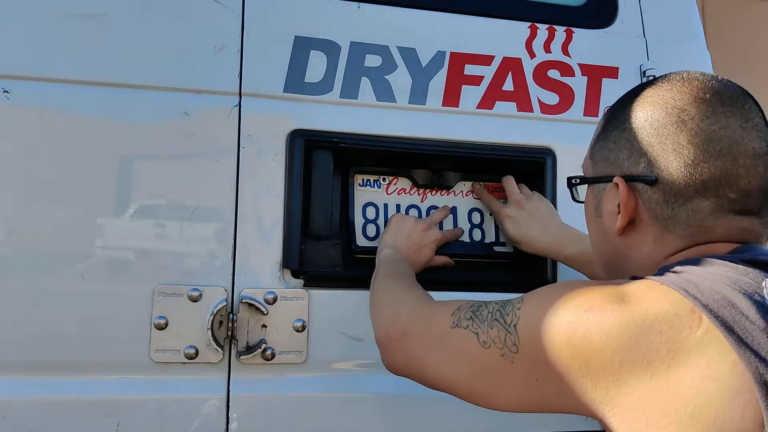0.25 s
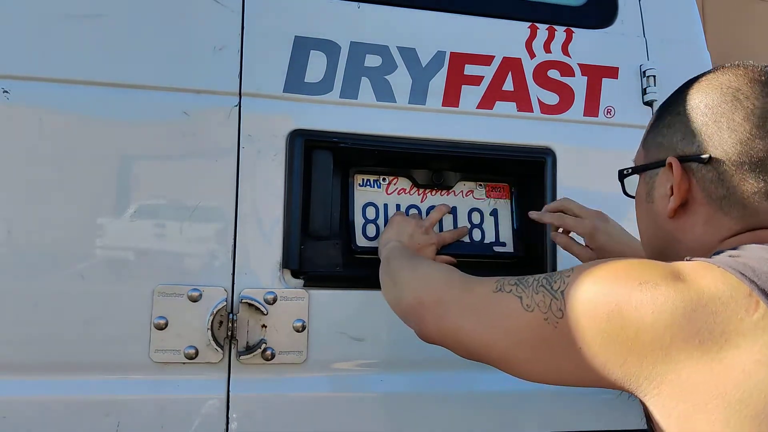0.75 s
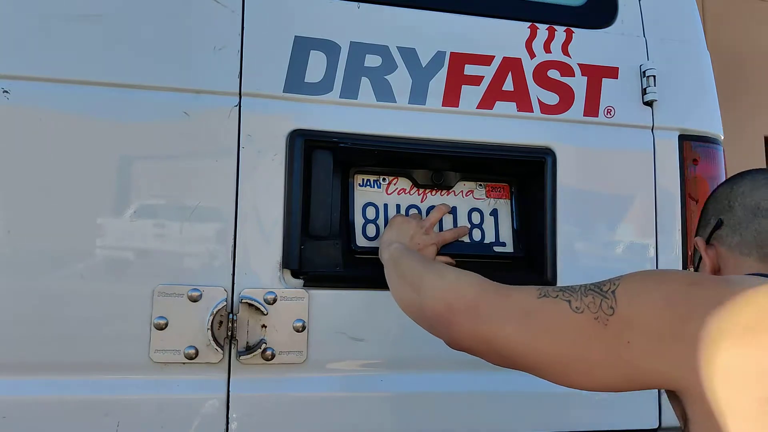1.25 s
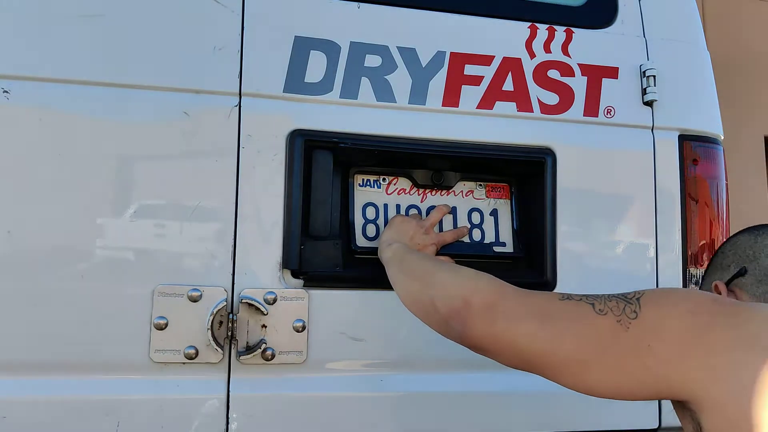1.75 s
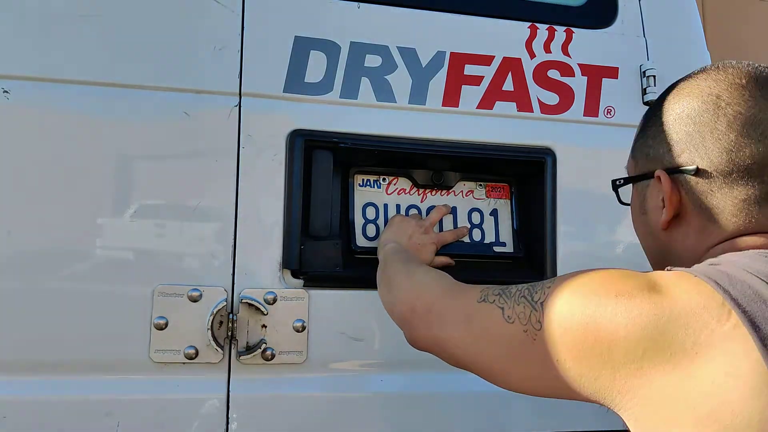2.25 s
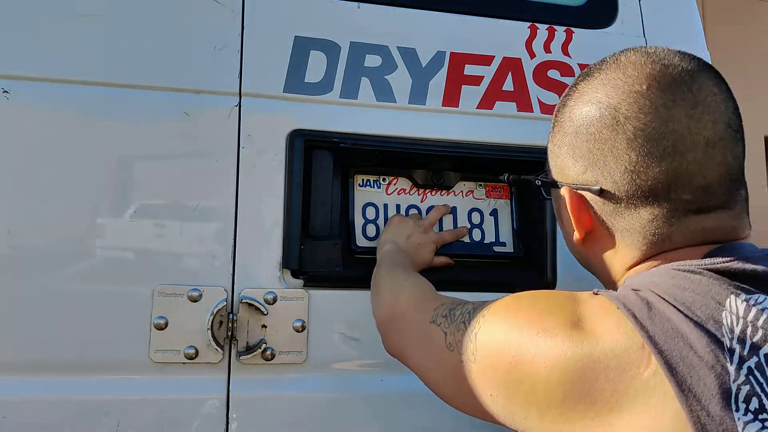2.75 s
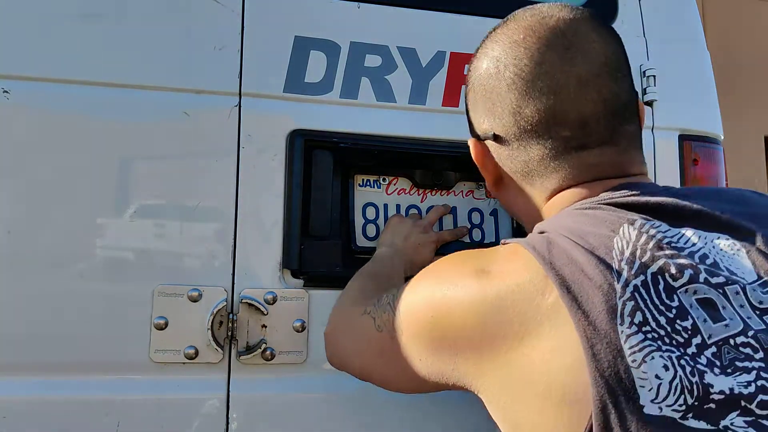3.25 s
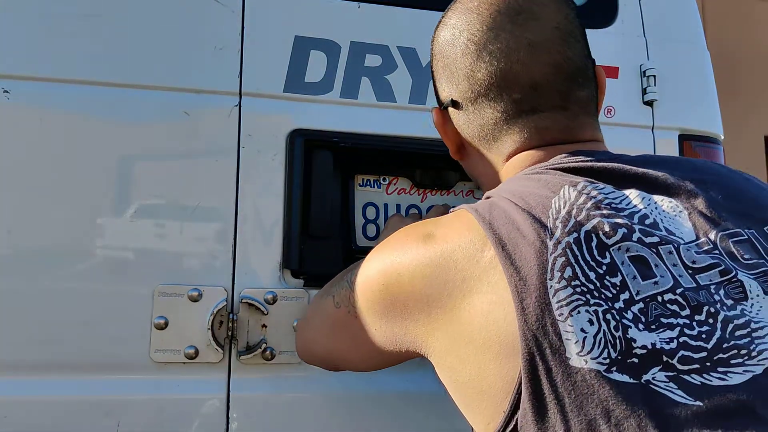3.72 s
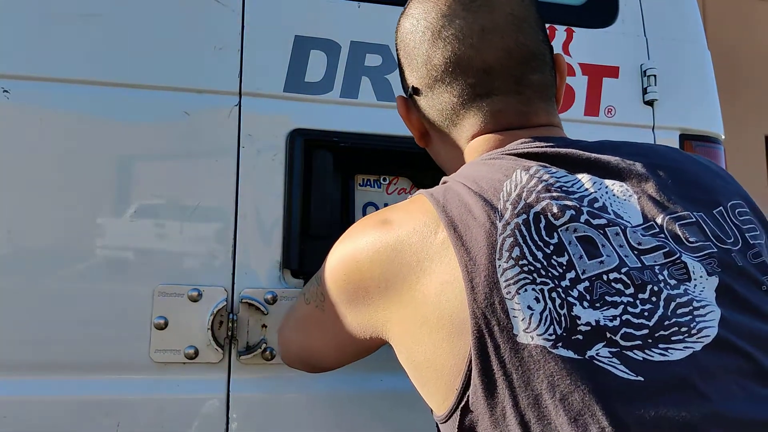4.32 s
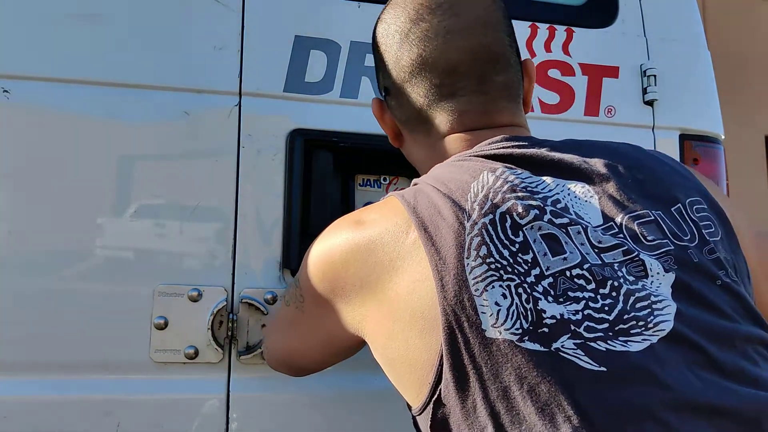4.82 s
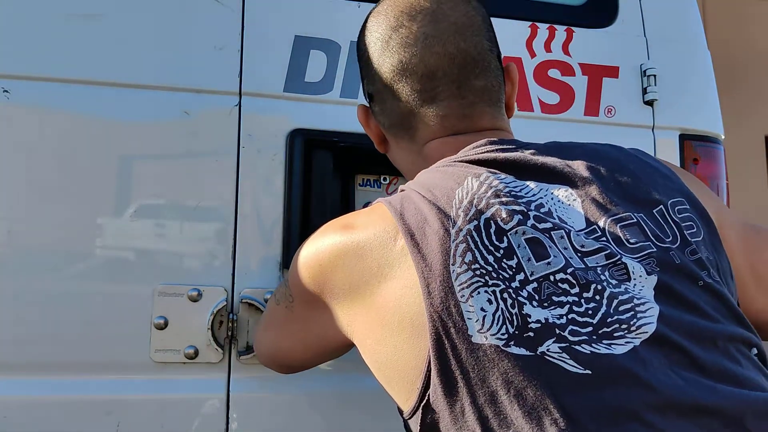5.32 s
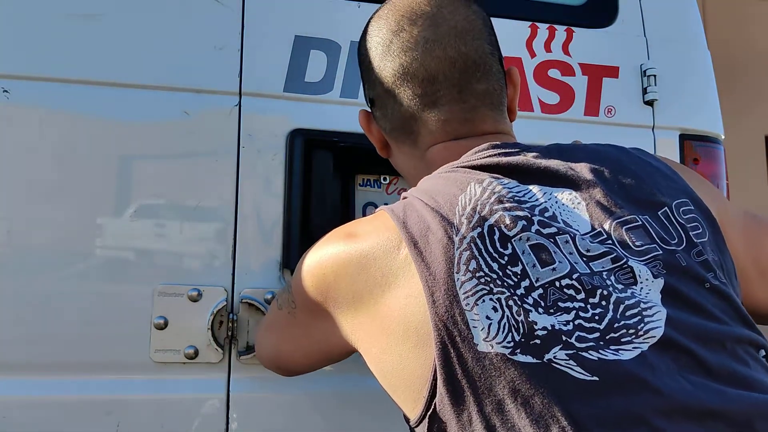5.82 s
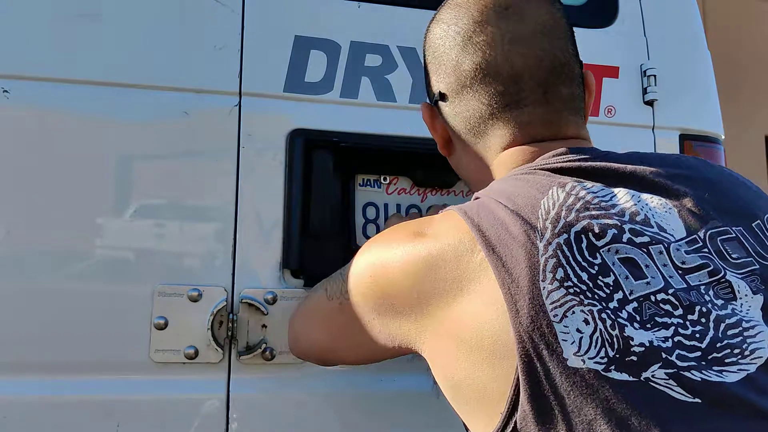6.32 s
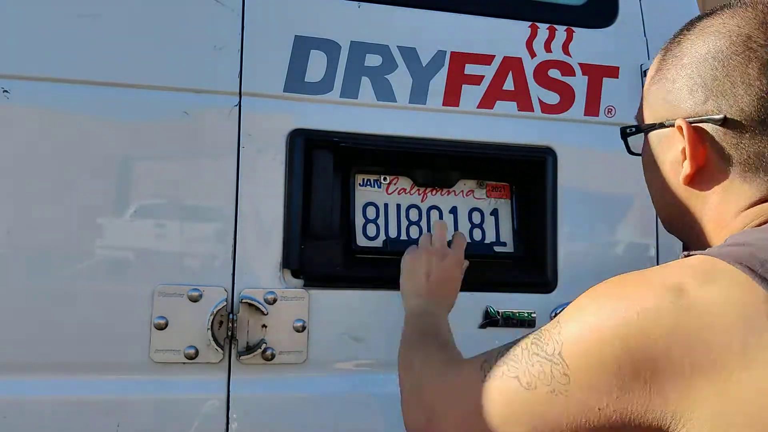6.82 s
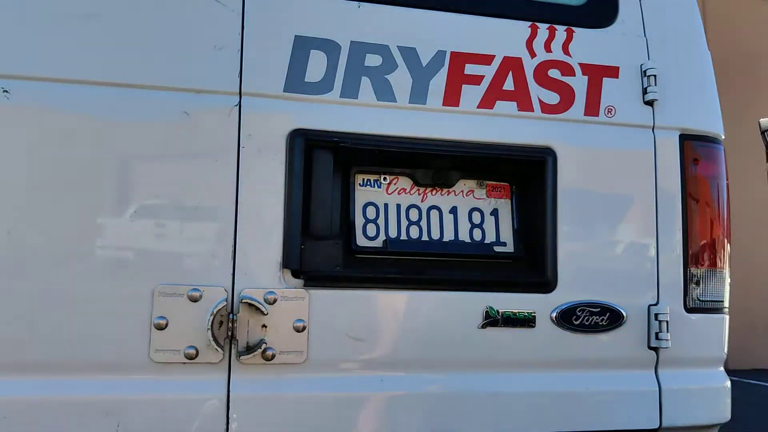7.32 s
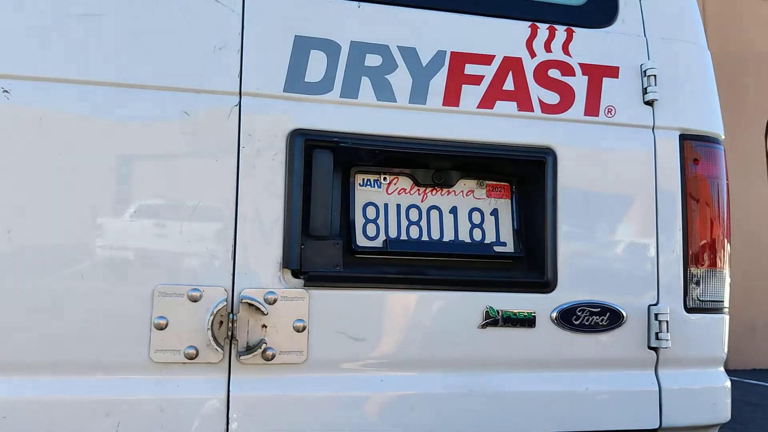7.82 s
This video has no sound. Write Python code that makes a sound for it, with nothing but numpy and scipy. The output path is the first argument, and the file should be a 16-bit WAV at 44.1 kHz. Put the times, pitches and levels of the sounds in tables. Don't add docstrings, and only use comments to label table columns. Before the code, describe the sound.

A low, steady rumble of distant traffic and machinery with faint hiss runs throughout an open yard. From 0.1 to 0.85 s, close light plastic and metallic clicks come in an irregular cluster, growing to a crisp tap at 0.85. It is nearly empty until a bright double click at 1.96. Very soft presses follow at 3.3 and 4.0 to 4.2, then a firmer knock with a low panel boom at 4.7. From 4.9 a screw grates in a low, slowing stick-slip judder, pulsing with each wrist turn, jumping to a higher squeak at 5.7 to 5.9. At 5.94 to 6.08 it slips: three loud, sharp cracks in rapid succession, with dull catches, boom and rattling buzz. A low metal ring and wash decay over about a second, with cloth rustle and a hard knock at 6.3. Faint touches until 7.2, then rumble; two tiny ticks at 8.0.

```python
import sys
import numpy as np
from scipy import signal
from scipy.fft import rfft, irfft
from scipy.io import wavfile

SR = 44100
rng = np.random.default_rng(int(sys.argv[2]) if len(sys.argv) > 2 else 0)


def elevation(decibels):
    levels = np.asarray(decibels, float)
    return 10 ** (levels / 20)


def unload_wav(signal):
    wavfile.write(
        sys.argv[1],
        SR,
        np.round(np.clip(np.atleast_2d(signal).T, -1, 1) * 32767).astype(np.int16),
    )


N = 355446

# start_s [s], frame_peak_db [dB], door_db [dB above frame], screw_db [dB above frame]
BIT_SLIPS = [
    (5.9389, -13, 1.5, -9),
    (5.9583, -4.5, -6.5, 1),
    (5.9787, -22.5, 2.5, -5),
    (6.0081, -3.5, -9.5, -3),
    (6.0341, -15.5, 2, -3),
    (6.0555, -4, -7, 0),
    (6.0848, -12.5, -6.5, -10.5),
]
# pitch_hz [Hz], level_db [dB per Hz]
FAR_HISS = [(88, -38.5), (150, -4), (179, -2.5), (209, -7.5), (459, -15.5), (496, -15), (628, -13),
            (1030, -19.5), (1110, -21), (3020, -37), (9220, -45), (15100, -42), (16300, -54)]
# pitch_hz [Hz], likeness [-1 to 1]
FAR_WIDTH = [(60, 0.99), (150, 0.96), (380, 0.61), (950, -0.35), (2380, -0.04), (5980, 0.055),
             (15000, -0.17)]
NEAR_WIDTH = [(60, 0.986), (180, 1), (550, 0.94), (1650, 0.7), (4970, 0.2), (15000, -0.69)]
LET_GO_S = 0.038


def rms_one(x):
    return x / np.sqrt(np.mean(x ** 2) + 1e-20)


def in_time(rows, t):
    s, *columns = np.transpose(rows)
    return [np.interp(t, s, c) for c in columns]


def at_hz(points, hz):
    point_hz, value = np.transpose(points)
    return np.interp(np.log(hz + 1), np.log(point_hz), value)


def coloured(x, spectrum):
    size = x.shape[-1]
    hz = np.arange(size // 2 + 1) * SR / size
    return rms_one(irfft(rfft(x) * elevation(at_hz(spectrum, hz)), size))


def stereo_noise(size, likeness):
    mid, side = rfft(rng.standard_normal((2, size)))
    alike = np.clip(at_hz(likeness, np.arange(len(mid)) * SR / size), -1, 1)
    return irfft(np.sqrt(1 + alike) * mid + np.sqrt(1 - alike) * side * [[1], [-1]], size)


def drift(rate_hz, size):
    r = np.exp(-2 * np.pi * rate_hz / SR)
    wander = signal.lfilter([1], [1, -2 * r, r * r], rng.standard_normal(size + SR // 2))
    return rms_one(wander[SR // 2:])


def add(out, at_s, sound):
    i = round(at_s * SR)
    out[:, i:i + sound.shape[1]] += sound[:, :N - i]


def yard():
    # time_s [s], rumble_db [dB]
    traffic = [(0.0, -36.5), (0.4, -37.5), (4.24, -41.5), (4.67, -40), (5.72, -41.5), (6.06, -38),
               (7.12, -42), (8.06, -42)]
    # pitch_hz [Hz], level_db [dB per Hz]
    rumble_shape = [(8.8, -36.5), (15, -7), (32, 0.5), (59, 3), (75, 1), (92, -7.5), (125, -2), (136, -13),
                    (145, -24.5), (178, -19), (210, -25.5), (230, -25), (250, -26), (320, -53.5),
                    (550, -120)]
    rumble_db, = in_time(traffic, np.arange(N) / SR)
    hiss_db = -53 + 0.73 * (rumble_db - rumble_db.mean())
    rumble = elevation(rumble_db + 2.2 + .5 * drift(3, N)) * coloured(stereo_noise(N, FAR_WIDTH), rumble_shape)
    hiss = elevation(hiss_db + .5 * drift(4.8, N)) * coloured(stereo_noise(N, FAR_WIDTH), FAR_HISS)
    return (rumble + hiss) * elevation([[.4], [-.4]])


def rustle():
    # start_s [s], length_s [s], peak_db [dB]
    strokes = [(0.116, 0.03766, -60.5), (0.195, 0.063, -63), (.74, .09, -69), (0.89, 0.06247, -67),
               (1.984, .12, -62), (4.665, 0.04, -68), (6.094, 0.14, -54), (6.332, 0.05713, -84),
               (6.559, 0.16853, -61.5), (6.695, 0.26, -71.5), (7.098, 0.19, -65.5)]
    shape = [(1200, -26.5), (2500, -5.0), (4000, -9.0), (5800, -1), (7500, -15.0), (15000, -23.0)]   # (Hz, dB per Hz)
    t = np.arange(N) / SR
    level = np.zeros(N)
    for start_s, length_s, peak_db in strokes:
        level += elevation(peak_db) * np.sin(np.pi * np.clip((t - start_s) / length_s, 0, 1) ** 1.1)
    return level * elevation(0.83 * drift(40, N)) * coloured(stereo_noise(N, NEAR_WIDTH), shape)


def struck(modes, size, contact_s, at_once, unlike, tilt_db, damping):
    hz, level_db, t60_s = np.repeat(np.transpose(modes), 9, axis=1)
    level_chance, side_chance, pitch_chance, phase_chance = rng.standard_normal((4, len(hz)))
    starts_s = contact_s * np.maximum(rng.exponential(1, len(hz)) - at_once, 0)
    since_s = np.maximum(np.arange(size) / SR - starts_s[:, None], 0)
    rise = np.minimum(3 * hz[:, None] * since_s, 1)
    pole = 2j * np.pi * hz * (1 + .07 * pitch_chance) - damping * np.log(1000) / t60_s
    rings = np.exp(pole[:, None] * since_s) * rise
    phase = phase_chance + unlike * np.minimum(hz / 2200, 1) * side_chance * [[1], [-1]]
    strength = elevation(level_db + tilt_db * np.log2(hz / hz[0]) + 2.0 * level_chance)
    out = np.imag(strength * np.exp(1j * phase) @ rings)
    fade = np.cos(np.pi / 2 * np.arange(size) / size) ** 2
    return out / np.abs(out).max() * fade


def knocks(rows, contact_s, at_once, crack_s, door_db, crack_db, pan_db, soft_db, damping, door_unlike=.1):
    # pitch_hz [Hz], level_db [dB], t60_s [s]
    frame_modes = [(1113, -4.5, 0.09), (1327, 1, 0.054), (1602, 1.5, 0.066), (1950, -6, 0.14),
                   (2280, 3, 0.059), (2600, -3.5, 0.088), (3220, -3, 0.046), (3513, 3.5, 0.014)]
    door_modes = [(210, 2.5, 0.092), (295, -2, 0.091), (370, 1.5, 0.051), (440, -12.5, 0.23),
                  (553.78, -4, 0.098), (671, 1.5, 0.065), (735, -2, .06), (897, 3, 0.054)]
    screw_modes = [(4200, -4.5, 0.088), (4190, -0.5, 0.0077), (4860, -8, 0.016), (5187, 0.5, 0.024),
                   (5530, 6, 0.012), (5533, 3.5, 0.06), (6290, -5.5, 0.036), (6670, -1.5, 0.029),
                   (7150, -20, 0.011)]
    out, size = np.zeros((2, N)), 1536
    t = np.arange(size) / SR
    top = signal.butter(2, 7000, "high", fs=SR, output="sos")
    for start_s, frame_db, low_db, screw_db in rows:
        dull_db = low_db + door_db - screw_db
        touch_s = contact_s * elevation(np.clip(.25 * dull_db, -8, 8))
        place_db = pan_db + 1.5 * rng.uniform(-1.7, 1)
        blow = elevation(place_db * np.array([[.5], [-.5]])) * elevation(frame_db)
        frame_tilt_db = np.clip(-.3 * dull_db, -8, 1.5) - soft_db
        frame = struck(frame_modes, size, touch_s, at_once, 0.67, frame_tilt_db, damping)
        door = struck(door_modes, 3 * size, 1.5 * touch_s, at_once, door_unlike, -0.75 - 1.3 * soft_db, damping)
        head = struck(screw_modes, size, touch_s, at_once, 0.69, -1.9, damping)
        bright_db = crack_db + .6 * screw_db + 0.21 * (frame_db + 25.5)
        swell = np.exp(-t / crack_s) * np.minimum(t / touch_s * 0.98, 1)
        crack = signal.sosfilt(top, rng.standard_normal((2, size))) * swell
        add(out, start_s, blow * frame)
        add(out, start_s, blow * elevation(low_db + door_db) * door)
        add(out, start_s, blow * elevation(screw_db) * head)
        add(out, start_s, blow * elevation(bright_db) * crack)
    return out


def frame_taps():
    taps = [(0.1186, -49, -4, -12), (0.1854, -61.5, -1, 10), (0.2608, -24, -27.5, -6),
            (0.3471, -27, -8.5, -10), (0.3781, -26, -20.5, 1), (0.5044, -34, -23.5, -8),
            (0.5151, -32.5, -24, -2), (0.5287, -30.5, -23.5, -4), (0.5404, -39.5, -13, -21),
            (0.5544, -36, -19, -18), (0.5651, -31.5, -16, -0.5), (0.594, -25.5, -25, -1),
            (0.6424, -25, -29, 6), (0.6683, -35, -14, -13), (0.7083, -18.5, -28, 2.5),
            (0.845, -14, -31.5, -4), (1.4331, -49, -2.5, -19.5), (1.9586, -13.5, -28, 5.5),
            (1.9722, -19.5, -21.5, 1)]
    return knocks(taps, contact_s=.0012, at_once=.7, crack_s=0.0023, door_db=7.5, crack_db=-10.5, pan_db=0.7,
                  soft_db=-1.6, damping=1.45)


def frame_presses():
    presses = [(3.321, -44, 5, -14), (3.3344, -48.5, -8, -19), (3.3795, -44, 5, -20),
               (3.9769, -38.5, -2.5, -4.5), (4.0075, -47.5, 1, -11), (4.131, -45, -4.5, -19.5),
               (4.1955, -36.5, 0.5, -5.5), (4.2093, -33, -8, -4.5), (4.7246, -17.5, -4.5, -2.5),
               (4.819, -29, -13.5, 2.5), (6.1809, -39.5, -3, -26), (6.2337, -38.5, -16, -18),
               (6.6801, -44, -7, -14), (6.7844, -54, -11, -9)]
    return knocks(presses, contact_s=.0015, at_once=.4, crack_s=0.0023, door_db=6.5, crack_db=-7.5, pan_db=2.5,
                  soft_db=-0.5, damping=0.77)


def door_shake():
    shakes = [
        (4.682, 0.17, -34, -55, 62),
        (5.951, 0.12, -26.5, -29.5, 405),
        (6.098, 0.014, -30.5, -51, 55),
        (6.292, 0.01299, -51, -52.5, 202),
    ]
    boom_shape = [(18, -18.5), (38, 18), (70, -7.5), (160, -4.5), (300, -58.5), (600, -100)]   # (Hz, dB per Hz)
    buzz_shape = [(150, -35.5), (300, -2.5), (900, -10.5), (2500, -18), (6000, -20), (8000, -33.5),
                  (16000, -32.5)]
    out, rise_s, tail_s = np.zeros((2, N)), 0.01, .25
    for start_s, hold_s, boom_db, buzz_db, release_db_per_s in shakes:
        t = np.arange(0, hold_s + tail_s, 1 / SR)
        release = elevation(-release_db_per_s * np.maximum(t - hold_s, 0))
        shape = np.minimum(t / rise_s, 1) * release * np.minimum((t[-1] - t) / .03, 1)
        noise = stereo_noise(len(t), NEAR_WIDTH)
        boom = elevation(boom_db) * coloured(noise, boom_shape)
        buzz = elevation(buzz_db + 6.0 + 2.0 * drift(30, len(t))) * coloured(noise, buzz_shape)
        add(out, start_s, (boom + buzz) * shape)
    t = np.arange(SR) / SR
    wash_s, wash_db, wash_t60_s = 6.08, -35.5, 1.3
    wash = coloured(stereo_noise(SR, FAR_WIDTH), FAR_HISS)
    add(out, wash_s, elevation(wash_db - 60 * t / wash_t60_s) * np.minimum(t / rise_s, 1) * wash)
    return out


def pressure(turns, t):
    return sum(np.interp(t, [start, peak, peak + LET_GO_S], [0, 1, 0]) for start, peak, *_ in turns)


def thread(start_s, end_s, rates, turns, tone, jitter, high_clean, broken_db, low_db, high_db, high_push_db,
           fade_db_per_s):
    # pitch_hz [Hz], level_db [dB per Hz]
    low_shape = [(120, -19), (200, 1.5), (429, -10), (660, 3), (823, -6), (1220, -2.5), (2200, -27),
                 (2860, -23), (4840, -120)]
    high_shape = [(880, -36), (1500, -15.5), (1940, -14), (2210, -5), (2490, -10.5), (2830, -6.5),
                  (3220, -7.5), (3410, -6.5), (4290, -14), (5830, -7), (7920, -19), (14500, -21.5),
                  (16000, -30.5)]
    t = np.arange(start_s, end_s, 1 / SR)
    rate_hz, clean = in_time(rates, t)
    fade_db = fade_db_per_s * np.minimum(t - turns[0][1], 0)
    low_db = low_db + fade_db
    high_db = high_db + fade_db + high_push_db * pressure(turns, t)
    cycles = np.cumsum(rate_hz * (1 + jitter * drift(40, len(t)))) / SR
    slips = np.zeros((2, len(t)))
    for k in range(1, 16):
        phase = 2 * np.pi * rng.random() + 0.18 * k * rng.standard_normal((2, 1))
        slips += elevation(broken_db * drift(23.95, len(t))) * np.sin(2 * np.pi * k * cycles + phase)
    rub = stereo_noise(len(t), NEAR_WIDTH) * elevation(1.3 * drift(59, len(t)))
    low_share, high_share = np.clip([clean, high_clean * clean], 0, 1)
    low = np.sqrt(low_share) * coloured(slips, tone) + np.sqrt(1 - low_share) * coloured(rub, low_shape)
    high = np.sqrt(high_share) * coloured(slips, high_shape) + np.sqrt(1 - high_share) * coloured(rub, high_shape)
    onset = np.minimum((t - t[0]) / 0.0054, 1)
    return (elevation(low_db) * low + elevation(high_db) * high) * elevation([[.8], [-.8]]) * onset


def scuff(length_s, from_hz, to_hz, level_db):
    t = np.arange(0, length_s, 1 / SR)
    cycles = np.cumsum(np.interp(t, [0, t[-1]], [from_hz, to_hz])) / SR
    slow = signal.butter(2, 750, fs=SR, output="sos")
    wobble = signal.sosfilt(slow, rng.standard_normal((2, 2, len(t))))
    band = wobble[0] * np.cos(2 * np.pi * cycles) + wobble[1] * np.sin(2 * np.pi * cycles)
    swell = np.sin(np.pi * (t / t[-1]) ** 1.35)
    return elevation(level_db) * rms_one(band) * swell * elevation([[1.5], [-1.5]])


def screw():
    # start_s [s], peak_s [s], strength_db [dB]
    drill_turns = [
        (4.978, 5.063, -64),
        (5.169, 5.244, -38),
        (5.352, 5.449, -39.5),
        (5.557, 5.655, -41),
    ]
    # start_s [s], peak_s [s]
    bites = [
        (5.759, 5.803),
        (5.87, 5.903),
    ]
    # time_s [s], rate_hz [slips per s], clean_share [0-1]
    judder_rate = [(4.86, 376, 0.12), (5.08, 376, 0.56), (5.135, 290, 0.8), (5.221, 322, 0.9),
                   (5.27, 300.96, 0.64), (5.33, 257, 0.55), (5.4, 255, 0.93), (5.47, 236, 0.41),
                   (5.711, 247.2, 0.71)]
    squeak_rate = [(5.71, 544.3, .1), (5.772, 568, 0.59), (5.84, 569.7, 0.89), (5.852, 560, 0.096),
                   (5.858, 503, 0.14), (5.885, 497, 0.92), (5.915, 495.8, 0.88), (5.95, 480, .1)]
    # pitch_hz [Hz], level_db [dB per Hz]
    judder_tone = [(200, -14), (420, -2.5), (620, -9), (900, -2), (1200, 2), (1500, -1.5), (1750, -7.5),
                   (2200, -10), (3400, -23)]
    squeak_tone = [(300, -33), (560, 3.5), (1130, 5.5), (1700, -12.5), (2200, -6), (2900, -37.5)]
    out = np.zeros((2, N))
    judder_s, squeak_s, end_s = 4.86, 5.71, 5.945
    judder = thread(judder_s, squeak_s, judder_rate, drill_turns, judder_tone, jitter=.013, high_clean=.02,
                    broken_db=4.8, low_db=-42, high_db=-44.5, high_push_db=6, fade_db_per_s=67)
    squeak = thread(squeak_s, end_s, squeak_rate, bites, squeak_tone, jitter=0.014, high_clean=.8,
                    broken_db=6.0, low_db=-35, high_db=-36, high_push_db=13.5, fade_db_per_s=28)
    add(out, judder_s, judder)
    add(out, squeak_s, squeak)
    for start_s, peak_s, strength_db in drill_turns:
        length_s = peak_s + LET_GO_S - (start_s + 0.035)
        add(out, start_s + 0.0082, scuff(length_s, from_hz=3700, to_hz=6640, level_db=strength_db))
    return out


def bit_slips():
    return knocks(BIT_SLIPS, contact_s=.0045, at_once=.12, crack_s=0.0057, door_db=-.5, crack_db=-8, pan_db=2.5,
                  soft_db=-2.14, damping=.8)


def panel():
    long_rings = [
        (350, -35.5, 1.13),
        (615, -38, 0.22),
    ]
    out, t = np.zeros((2, N)), np.arange(SR) / SR
    for hz, level_db, t60_s in long_rings:
        ring = elevation(level_db - 60 * t / t60_s) * np.sin(2 * np.pi * hz * t)
        add(out, BIT_SLIPS[-1][0], ring * elevation([[.8], [-.8]]))
    return out


def tool_knocks():
    handling = [
        (6.2807, -36, -8, -5),
        (6.3065, -18.5, -9.5, -4),
        (8.0032, -49, -12.5, 10),
        (8.0234, -53, -2.5, 8.5),
    ]
    return knocks(handling, contact_s=.0025, at_once=0.33, crack_s=0.0037, door_db=7.5, crack_db=2, pan_db=3.5,
                  soft_db=-3.0, damping=3.2)


def echoes(x):
    # delay_s [s], level_db [dB]
    bounces = [
        (.005, -10.5),
        (0.089, -37.5),
    ]
    out = np.zeros((2, N))
    smear = rng.standard_normal((2, 2048)) * np.exp(-np.arange(2048) / SR / .0055)
    smear /= np.sqrt(np.sum(smear ** 2) / 2)
    dull = signal.sosfilt(signal.butter(2, [500, 6500], "band", fs=SR, output="sos"), x[::-1])
    back = signal.fftconvolve(dull, smear, axes=1)
    for delay_s, level_db in bounces:
        add(out, delay_s, elevation(level_db) * back)
    return out


def scene():
    near = frame_taps() + frame_presses() + bit_slips() + tool_knocks()
    return yard() + rustle() + near + echoes(near) + door_shake() + screw() + panel()


def roll_off(x):
    return signal.sosfilt(signal.butter(12, 16440, fs=SR, output="sos"), x)


def record(dry):
    rounded = 1.3 * np.tanh(dry / 1.3)
    low_pass = signal.cheby2(10, 42, 16300, fs=SR, output="sos")
    mix = signal.sosfilt(low_pass, rounded)
    return roll_off(mix)


dry = scene()
out = record(dry)
unload_wav(out)
```